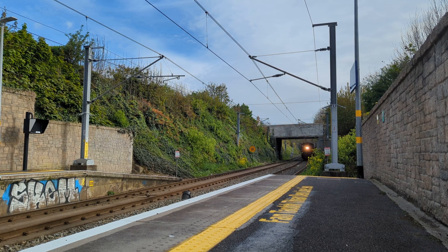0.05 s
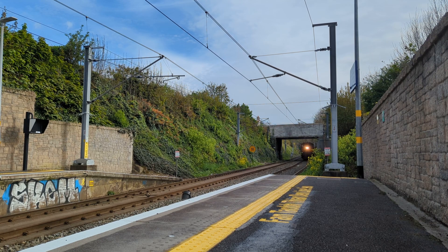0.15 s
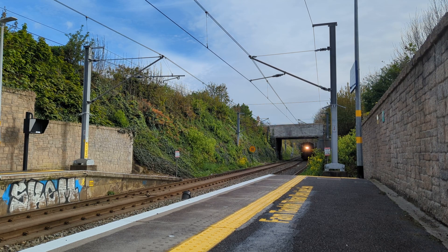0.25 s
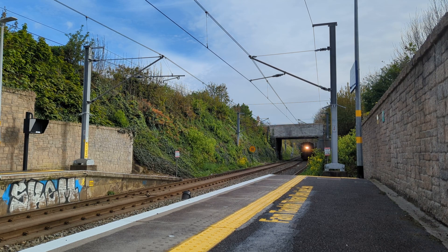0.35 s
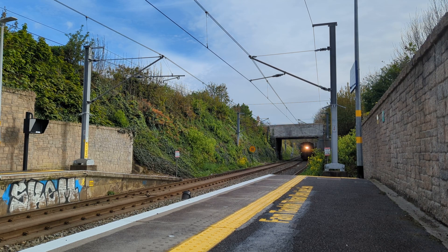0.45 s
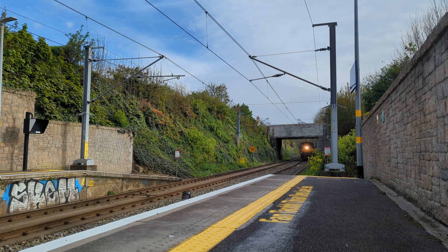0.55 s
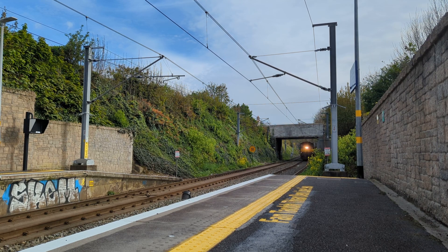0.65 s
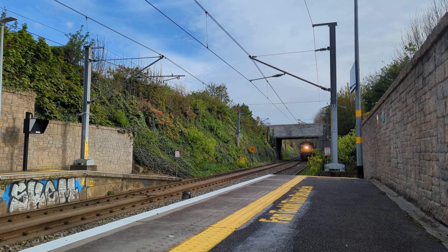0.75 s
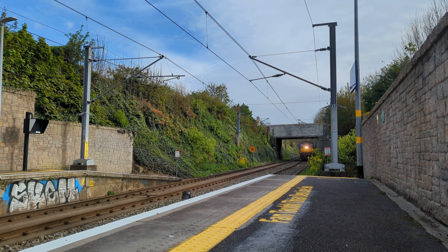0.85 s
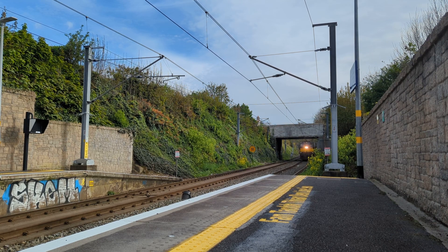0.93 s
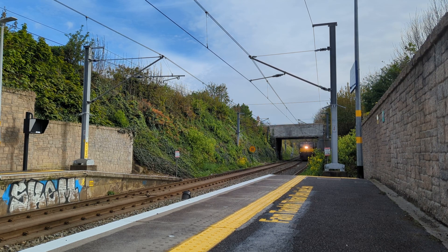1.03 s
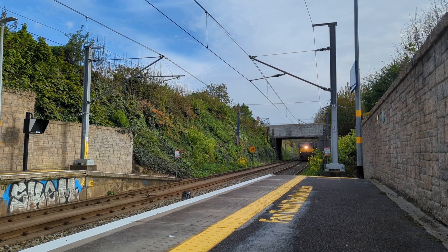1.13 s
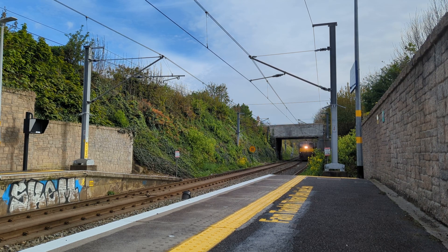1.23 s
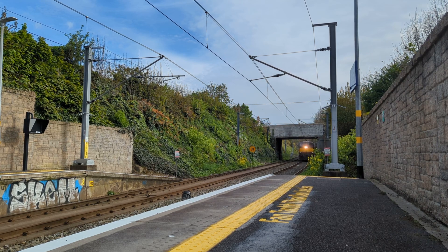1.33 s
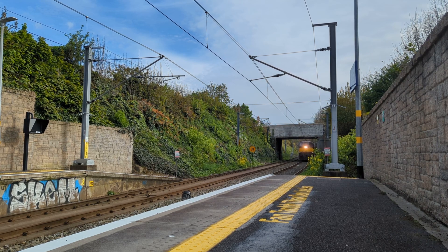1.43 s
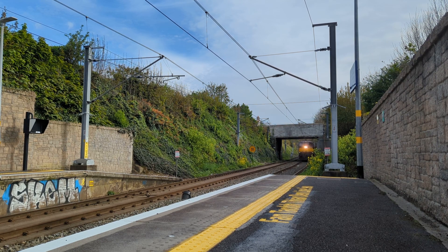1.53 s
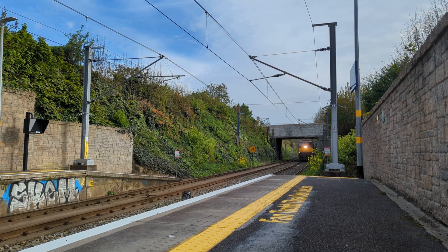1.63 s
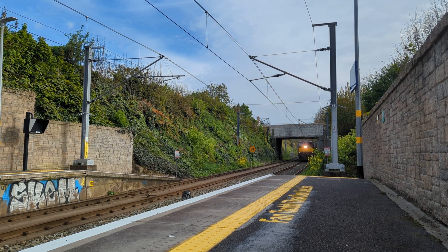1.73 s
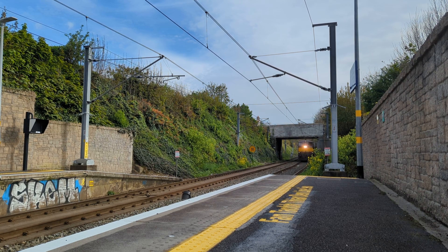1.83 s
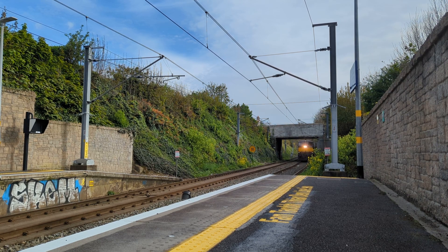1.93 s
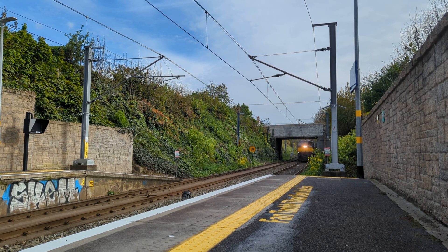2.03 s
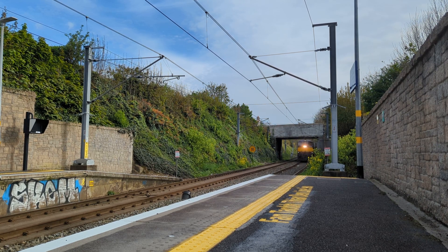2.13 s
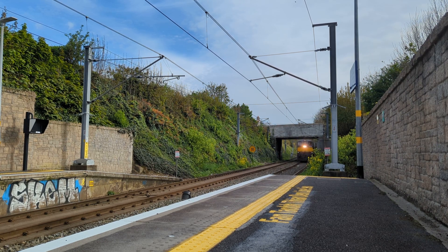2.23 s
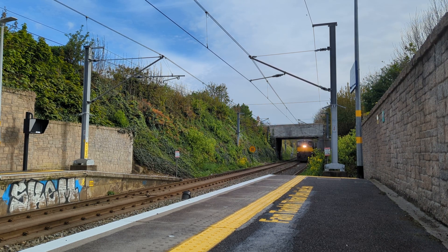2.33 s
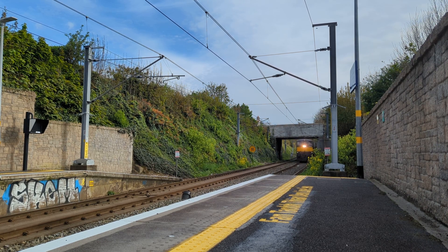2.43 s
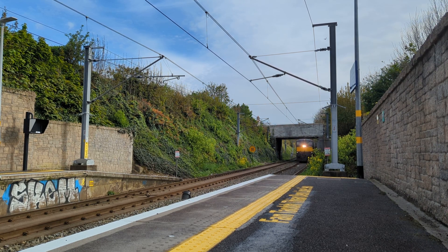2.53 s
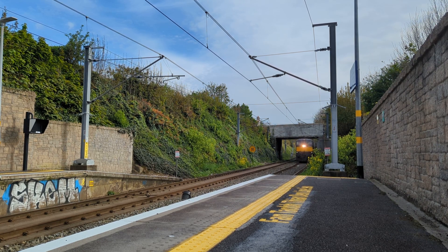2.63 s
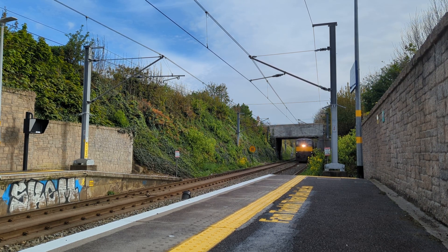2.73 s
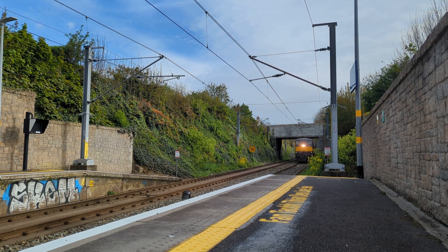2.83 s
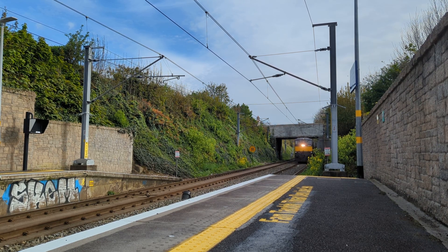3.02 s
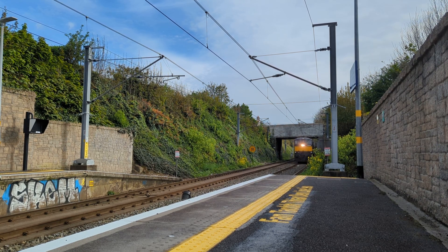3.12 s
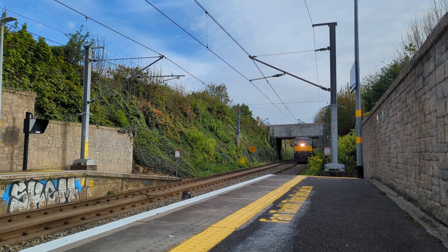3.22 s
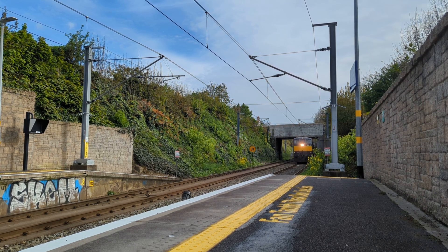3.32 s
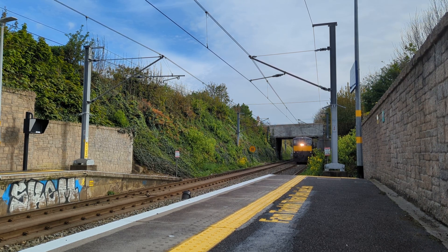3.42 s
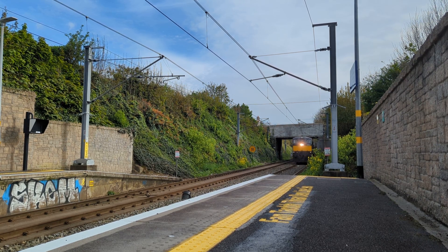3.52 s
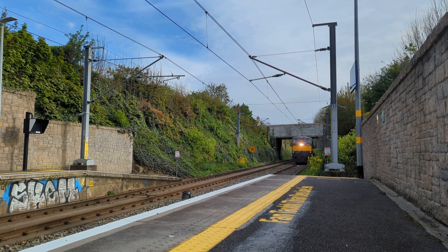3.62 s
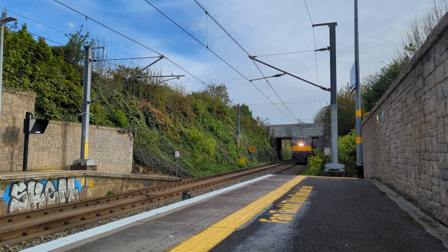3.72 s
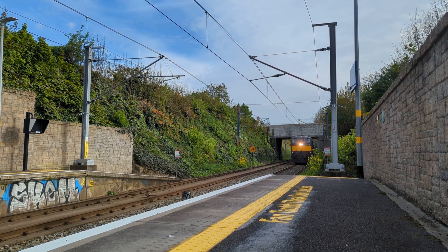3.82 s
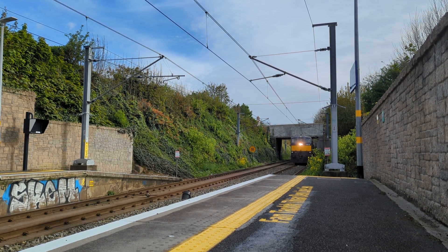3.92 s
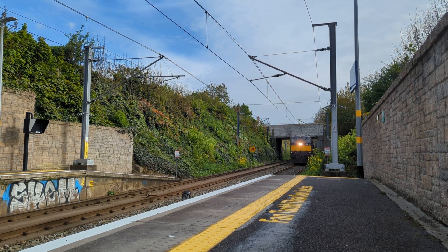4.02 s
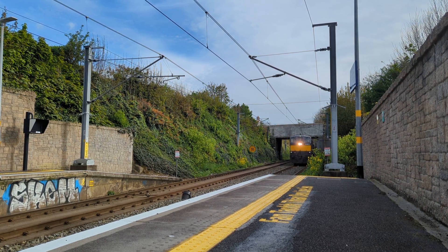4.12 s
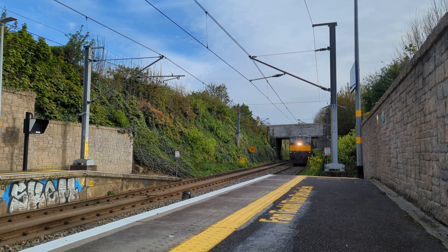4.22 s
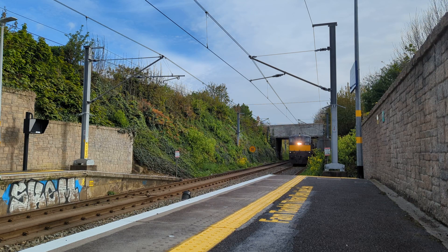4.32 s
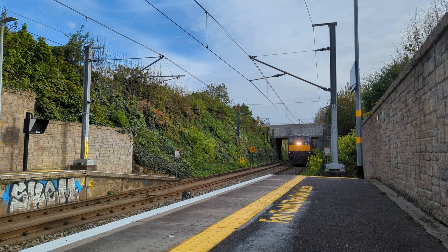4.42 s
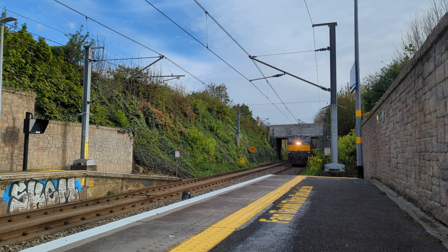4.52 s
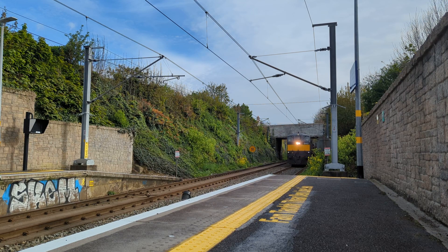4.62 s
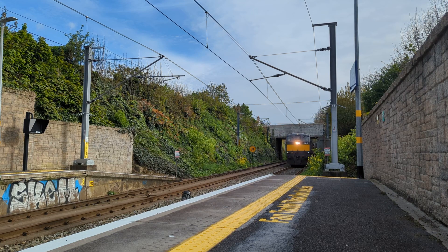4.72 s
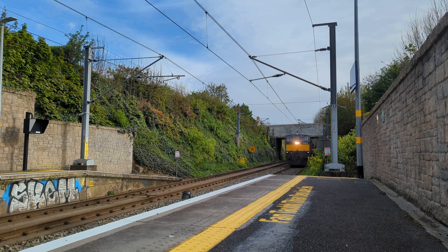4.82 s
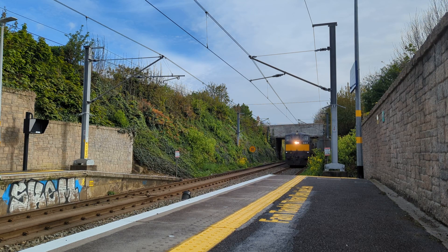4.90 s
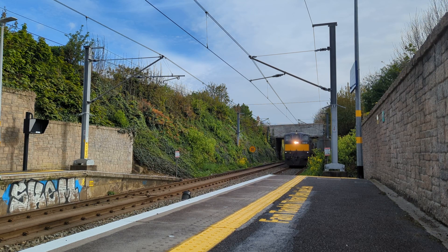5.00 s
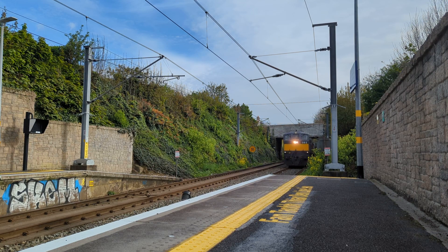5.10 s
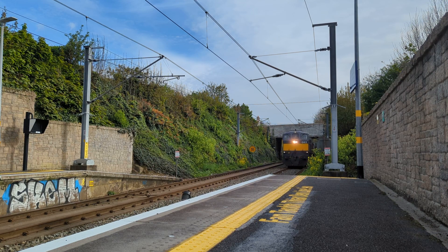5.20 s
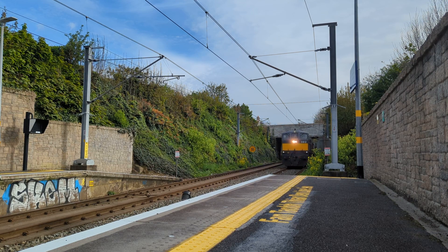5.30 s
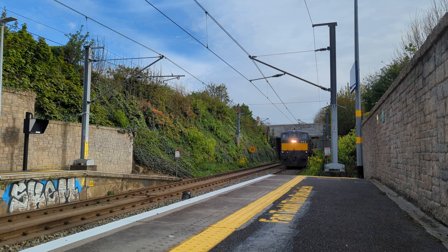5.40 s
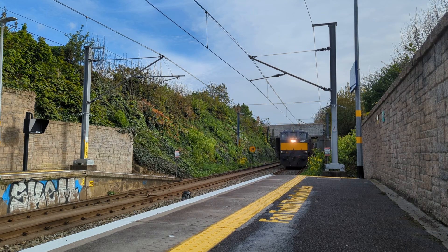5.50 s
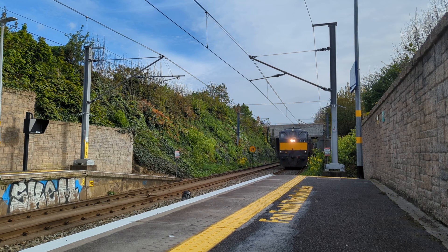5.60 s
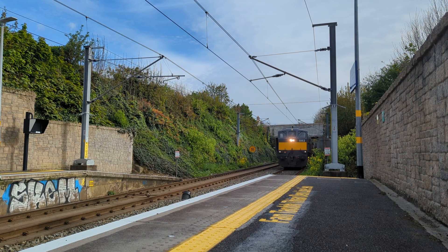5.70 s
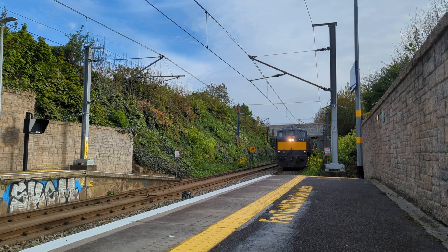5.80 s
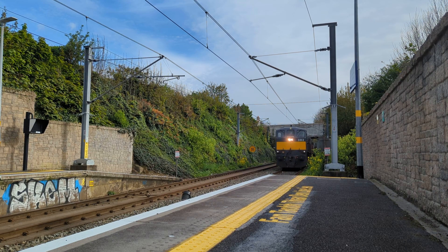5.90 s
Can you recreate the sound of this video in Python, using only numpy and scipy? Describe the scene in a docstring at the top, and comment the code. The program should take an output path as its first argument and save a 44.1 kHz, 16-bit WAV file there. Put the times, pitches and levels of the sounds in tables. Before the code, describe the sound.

A horn's beating echo decays between stone walls and banks, leaving a slow, uneven diesel throb and low rumble. Quick high bird whistles and a faint repeated buzzing call sit above it. After about four seconds the locomotive revs up, its exhaust beat stronger and blower whistle rising and widening. A harsh single-note air horn bursts in at the close. Stationary stereo pickup, train approaching from ahead, little wind.

```python
"""A walled platform in a cutting, a diesel locomotive nearing. The echo of a horn blast dies away as
detuned sines; the exhaust throbs as beating firing orders; rumble, roar and hiss are shaped noise.
The engine and its turbine (smeared tones) speed up, birds (bent sines) call from the banks,
and the air horn (a stack of partials) sounds again, close.
The microphone cuts the deepest bass; the recorder's band-splitting filters mirror tones about 8 and 16 kHz."""
import sys
import numpy as np
from scipy import signal
from scipy.fft import rfft, irfft, next_fast_len
from scipy.io import wavfile
from scipy.ndimage import uniform_filter1d, map_coordinates

SR = 44100
rng = np.random.default_rng(int(sys.argv[2]) if len(sys.argv) > 2 else 0)


def elevation(decibels):
    """Turn decibel levels (scalar or array-like) into linear amplitude ratios."""
    levels = np.asarray(decibels, float)
    return 10 ** (levels / 20)


def put_to_file(sound):
    """Save the sound as 16-bit audio at rate SR, in the file named by the first command-line argument."""
    columns = np.atleast_2d(sound).T  # one column per channel
    safe = np.clip(columns, -1, 1)
    whole_steps = np.round(safe * 32767)
    wavfile.write(sys.argv[1], SR, whole_steps.astype(np.int16))


N = 262395

# Left-right likeness of noise. Each row: frequency in Hz, likeness 0-1.
ALIKE = [(60, 0.93), (150, 1), (380, 0.95), (950, 0.65), (2370, 0.066), (5960, 0.074), (14900, 0.03)]
# Reverberation of banks and walls. Each row: frequency in Hz, 60 dB decay time in seconds.
CUTTING_DECAY = [(300, 0.8), (2000, 0.5), (8000, 0.19)]
# Gain as the train leaves the bridge and nears. Each row: time in seconds, gain in dB.
APPROACH = [(.75, -7.5), (1.65, -2), (2.7, -2), (3.5, 1.5), (4, 2.5), (5, 4), (5.75, 5.5)]
# Engine speed. Each row: time in seconds, share of the coasting speed.
SPEED = [(0, 0.995), (3.7, 1), (4.25, 1.015), (4.7, 1.11), (5.2, 1.2), (5.55, 1.25), (5.95, 1.26)]
FULL_POWER_RISE = 0.21  # rise of the speed share at which the engine pulls hard
LEFT_LAG_S = 6.2e-5  # the right port is nearer to the train

# Bird whistles. Each row: start in seconds, length in seconds, start, middle and end pitch in Hz,
# level in dB before the flutter.
WHISTLES = [(.822, .022, 5100, 4700, 4300, -57), (0.847, .026, 3880, 3420, 2930, -56.5),
            (1.69, 0.064, 3400, 3660, 3430, -59), (1.975, .04, 7550, 8000, 8300, -64),
            (2.01, .055, 8200, 7700, 7500, -64), (2.075, .06, 7900, 6900, 7600, -62),
            (2.085, .105, 8750, 8620, 8400, -66), (2.19, .068, 7450, 8100, 8350, -56),
            (2.26, .19, 8300, 8150, 8050, -67), (2.303, 0.024, 4050, 3630, 3750, -48),
            (2.318, 0.011, 4570, 4400, 4150, -50.5), (2.328, 0.02, 3690, 3350, 3360, -48),
            (2.345, .014, 3800, 4000, 3800, -56), (2.354, .013, 3700, 3450, 3350, -49),
            (2.381, .016, 3850, 3550, 3350, -48), (2.45, .021, 4050, 4100, 4750, -49),
            (2.491, .018, 4500, 4500, 4550, -48), (2.524, .034, 4500, 3550, 3350, -43),
            (2.566, 0.016, 3750, 3534, 3320, -48), (2.58, 0.016, 3800, 3510, 3250, -54),
            (2.6, 0.1, 3210, 3120, 3190, -59), (2.684, 0.03, 3090, 3080, 3000, -61),
            (2.794, .03, 7700, 7000, 7700, -53), (2.822, .032, 7800, 8000, 7000, -55),
            (2.794, .06, 6600, 6550, 6600, -48), (2.849, .024, 6600, 5750, 6900, -45),
            (2.872, .026, 6800, 7000, 6700, -54), (2.865, .045, 7500, 8600, 8000, -57),
            (2.897, .022, 6600, 6300, 6550, -50), (2.91, .035, 8300, 8500, 8200, -60),
            (2.92, .03, 6600, 6600, 6500, -58), (2.972, .034, 6850, 6550, 6400, -51),
            (3.59, .17, 7500, 7100, 6850, -61), (3.58, .06, 8450, 8600, 8800, -66),
            (5.412, 0.023, 4820, 4500, 3670, -52), (5.58, 0.13, 8800, 8500, 8410, -62.5)]
# Starts of two-part chirps in seconds.
CHIRP_STARTS_S = [1.633, 4.46]
# Rising rasp of a chirp: length in seconds, start, middle and end pitch in Hz, level in dB before roughening.
RASP = (.041, 4371.5, 4753.5, 5414, -51)
# Whistle after the rasp: delay in seconds, length in seconds, start, middle and end pitch in Hz,
# level in dB before the flutter.
ARCH = (.039, .059, 2789.5, 3203, 2901, -49.5)
# Mean tones of a farther bird's buzz. Each row: frequency in Hz, level in dB before roughening.
BUZZ_TONES = [(6310, -62), (5790, -65), (5270, -72)]
BUZZ_START_S, BUZZ_EVERY_S, BUZZ_COUNT = 3.81, .156, 6
BUZZ_FIRST_LENGTH_S, BUZZ_SHRINKS_S = .09, .006  # each note is shorter than the last

# Echo of the earlier blast; rows for the first, second, third and higher partials. Each row: near walls
# in dB, their fall in dB/s, far banks in dB, their fall in dB/s.
ECHO = [(-27.5, 112, -40.5, 25), (-30, 125, -38, 28), (-31, 63, -34.5, 42), (-36.5, 81, -30.5, 40)]
# Weight of the partials above the third. Each row: frequency in Hz, gain in dB.
ECHO_TOPS = [(1950, -5.5), (2900, -12), (5300, -18), (7000, -30), (9000, -41.5), (12500, -47), (15000, -51)]
# Banks met at different speeds. Each row: fundamental in Hz, relative level in dB (scaled by partial).
ECHO_PATHS = [(489.4, 0.5), (486.4, -10), (484.9, 5)]
# A far wall returns the fundamental once more: time in seconds, spread in seconds, level in dB.
LATE_RETURN = (0.18, .045, -34)
ECHO_DULLS_DB_PER_OCTAVE_S = 4.3

# Noise spectra of the train. Each row: frequency in Hz, relative density in dB per Hz.
RUMBLE_SPECTRUM = [(25, -42.5), (40, -14.5), (60, -1.5), (85, -3), (130, -8.5), (240, -14), (300, -22),
                   (500, -26.5), (650, -52.5), (1100, -120)]
ROAR_SPECTRUM = [(150, -13), (250, -5.5), (297, -10), (759, -16.5), (1910, -19.5), (2370, -24),
                 (2730, -24.5), (3730, -30.5), (4560, -30), (5810, -39.5), (7500, -49), (9750, -78),
                 (16500, -120)]
HISS_SPECTRUM = [(2940, -33.5), (5000, -4), (7250, -13.5), (8510, -13.5), (9220, -17.5), (9940, -26),
                 (11700, -20), (13600, -34), (15400, -46)]
# Running noises, each: base level in dB, share of the approach gain, lift under power in dB.
RUMBLE_LEVEL, ROAR_LEVEL, HISS_LEVEL = (-36, 0.84, 1.7), (-44.5, 0.73, -0.88), (-67.5, 0.77, 4.9)

# Turbine whine. Each row: time in seconds, frequency in Hz, gain in dB.
TURBINE = [(.45, 4580, -75), (.7, 4544, -65), (1.3, 4560, -55.5), (2.7, 4436, -61), (3.5, 4450, -62),
           (3.9, 4583, -59), (4.4, 4932, -59), (5.95, 5877, -56.5)]
# Its wavering bands. Each row: multiple of the whine, width in Hz, level in dB, share of the approach gain.
WHINE_BANDS = [(1.002, 50, -2, -0.31), (.976, 150, -1.5, 0.92), (.62, 70, -2.5, -0.01)]
# Bands that join as it speeds up. Each row: multiple of the whine, width in Hz, level in dB.
SPREAD_BANDS = [(.97, 400, -1), (.61, 200, -7), (2, 500, -20), (.187, 33, 3)]
# Steady fan band: centre in Hz, width in Hz.
FAN = (2600, 80)
# Fan level. Each row: time in seconds, level in dB.
FAN_LEVEL = [(.6, -70.5), (2.5, -71.5), (4, -56.5), (5.5, -69.5)]

BELL_HZ = 493.2
# Near blast. Each row: time in seconds, diaphragm in Hz, fundamental gain in dB, overtone gain in dB.
BLAST = [(5.762, 400, -45, -45), (5.774, 424, -14, -10), (5.784, 438, -5, -2), (5.798, 465, 2.5, -4),
         (5.806, 493, 2.5, -2), (5.815, 494.5, 1.5, -.5), (5.875, 493.2, -1.5, -1),
         (5.915, 492.5, 1.5, -3.5), (5.95, 491.5, .5, -12)]
# Low horn partials as ground and walls deliver them. Each row: partial number, left in dB, right in dB.
HORN_PARTIALS = [(1, -16, -15), (2, -15, -23), (3, -24, -33), (4, -37, -29), (5, -27.5, -30), (6, -26, -40),
                 (7, -28, -32), (8, -36, -27), (9, -33, -37), (10, -40, -40), (11, -40, -35),
                 (12, -37, -35), (13, -31, -41), (14, -42, -35)]
# Higher horn partials. Each row: frequency in Hz, mean level in dB.
HORN_TOPS = [(7400, -35), (8500, -40), (11000, -36), (13000, -42.5), (15000, -49), (16800, -57.5)]
TOPS_SCATTER_DB, TOPS_RIGHT_DB = 2.5, 2.5  # from partial to partial; right over left
# Treble slope in dB per octave for each dB of weaker overtones, and its limit in dB per octave.
DULLING, DULLEST = .5, 2.6
# Rush of air in the horn. Each row: frequency in Hz, relative density in dB per Hz.
AIR_SPECTRUM = [(300, -20), (900, -2.5), (3000, 3.5), (4500, -17.5), (15000, -27.5)]

EXHAUST_HZ, CYCLE_HZ = 48.8, 2.7  # note and firing cycle at coasting speed
# Weaker orders of the firing cycle. Each row: order, coasting level in dB before the approach gain,
# level under power in dB.
ORDERS = [(12.6, -60.5, -32.5), (22.05, -47, -44.5), (28.8, -59.5, -39.5), (29.54, -49, -29),
          (32.6, -54, -41.5), (32.08, -37, -34.5), (34.23, -46.5, -28.5), (36.3, -51.5, -35),
          (46.56, -51.5, -39), (92.9, -53.5, -66.5)]
# Overtone that throbs with the note: multiple, coasting level in dB, level under power in dB, both re the note.
THIRD = (3.02, -20, -28)
# Throbs, where the note and its upper neighbour order fall in step. Each row: time in seconds,
# crest in dB, neighbour's share 0-1 until the next crest.
THROBS = [(-.05, -30, 0.3), (.23, -26, 0.23), (.46, -36.5, 0.5), (.64, -32, 0.1), (.84, -28, 0.75),
          (1.02, -34, 0.02), (1.229, -24.5, 0.3), (1.56, -21, 0.45), (1.919, -20, 0.72),
          (2.31, -18.5, 0.56), (2.67, -20.5, 0.63), (3.1, -21.5, .7), (3.28, -26.5, 0.6), (3.41, -24, 0.08),
          (3.569, -21.5, 0.37), (3.97, -19, 0.03), (4.211, -15, 0.7), (4.36, -26.5, .85), (4.489, -20, .4),
          (4.68, -14, 0.29), (4.88, -18, 0.87), (5.0, -28, 0.3), (5.111, -15.5, 0.7), (5.25, -13, 0.52),
          (5.411, -14, .55), (5.6, -18, .5), (5.73, -13.5, .5), (5.89, -19.5, 0), (6.05, -11, .5)]

# Mirror images from the band-splitting filters. Each row: mirror frequency in Hz, width in Hz, image level in dB.
MIRRORS = [(8000, 620, -1.5), (16000, 500, -3)]


def unit(x):
    """Scaled to rms 1."""
    return x / np.sqrt(np.mean(np.abs(x) ** 2) + 1e-20)


def along(points, hz):
    """(Hz, value) points read on a log frequency axis."""
    f, v = np.transpose(points)
    return np.interp(np.log(hz + 1), np.log(f + 1), v)


def curves(rows, size=N):
    """One value per sample for each column after the time."""
    s, *columns = np.transpose(rows)
    return [np.interp(np.arange(size) / SR, s, column) for column in columns]


def wobble(knots_per_s, size=N):
    """A smooth random curve through normal draws."""
    knots = rng.standard_normal(int(size * knots_per_s / SR) + 4)
    return map_coordinates(knots, [np.arange(size) * knots_per_s / SR])


def phase(hz):
    """Running phase of a changing frequency, in radians."""
    return 2 * np.pi * np.cumsum(hz) / SR


def filtered(x, response):
    """x times a response of frequency."""
    m = next_fast_len(N + 8192)
    return irfft(rfft(x, m) * response(np.fft.rfftfreq(m, 1 / SR)), m)[..., :N]


def rush(spectrum, patchy_db):
    """Stereo noise of rms 1 with patches of random gain; alike in the bass, unrelated in the treble."""
    z = signal.stft(rng.standard_normal((2, N)), nperseg=512)[2]
    field = rng.standard_normal(z.shape[1:])
    field = uniform_filter1d(uniform_filter1d(field, 5, 0), 12, 1)
    pair = signal.istft(z * elevation(patchy_db * unit(field)), nperseg=512)[1][:, :N]

    def mid_side(hz):
        angle = np.arccos(np.clip(along(ALIKE, hz), -1, 1)) / 2
        return elevation(along(spectrum, hz)) * [np.cos(angle), np.sin(angle)]

    mid, side = filtered(pair, mid_side)
    return unit(np.array([mid + side, mid - side]))


def fuzzy(turning, width_hz):
    """A tone smeared into a narrow band by random quadrature gains, new on each side."""
    return np.array([unit(wobble(width_hz) * np.cos(turning) + wobble(width_hz) * np.sin(turning))
                     for side in range(2)])


def cutting(x, delay_s):
    """The banks and walls answer with decaying noise; each frequency dies at its own speed."""
    hz, t, z = signal.stft(rng.standard_normal((2, SR // 2)), SR, nperseg=256)
    decay = elevation(-60 * t / along(CUTTING_DECAY, hz)[:, None])
    tail = signal.istft(z * decay, SR, nperseg=256)[1]
    late = np.pad(x * np.ones((2, 1)), ((0, 0), (round(delay_s * SR), 0)))
    return signal.fftconvolve(late, tail / np.linalg.norm(tail[0]), axes=1)[:, :N]


def power():
    """Engine load from its speed: 0 while coasting, 1 when it pulls hard."""
    return np.clip((curves(SPEED)[0] - 1) / FULL_POWER_RISE, 0, 1)


def nearer_right(x):
    """The left port hears the train a little later."""
    return filtered(x, lambda hz: np.exp(-2j * np.pi * hz * np.c_[[LEFT_LAG_S, 0]]))


def add_note(track, start_s, length_s, pitches_hz, db):
    """Adds one soft-edged sine that bends through three pitches."""
    u = np.linspace(0, 1, round(length_s * SR))
    hz = np.polyval(np.polyfit([0, .5, 1], pitches_hz, 2), u)
    envelope = np.sin(np.pi * u) ** .45
    track[round(start_s * SR):][:len(u)] += elevation(db) * np.sqrt(2) * envelope * np.sin(phase(hz))


def birds():
    """Clear whistles, two-part chirps and a repeated buzz, with a faint echo in the cutting."""
    clear, rasp, far = np.zeros((3, N))
    for start_s, length_s, *hz, db in WHISTLES:
        add_note(clear, start_s, length_s, hz, db)
    for start_s in CHIRP_STARTS_S:
        length_s, *hz, db = RASP
        add_note(rasp, start_s, length_s, hz, db)
        add_note(rasp, start_s, length_s, 2 * np.array(hz), db - 22)
        delay_s, length_s, *hz, db = ARCH
        add_note(clear, start_s + delay_s, length_s, hz, db)
    for n in range(BUZZ_COUNT):
        start_s = BUZZ_START_S + n * BUZZ_EVERY_S
        length_s = BUZZ_FIRST_LENGTH_S - n * BUZZ_SHRINKS_S
        for hz, db in BUZZ_TONES:
            bend = 1 + .006 * rng.standard_normal(3)
            add_note(far, start_s, length_s, hz * bend, db + 1.5 * rng.standard_normal())
    flutter = elevation(4 * wobble(150) - 3)  # leaves and moving air break up the notes
    near = clear * flutter + rasp * (0.5 + wobble(700))
    far = far * (0.3 + wobble(220)) * elevation([[1.2], [-1.5]])
    song = near * elevation([[.1], [-.8]]) + far
    return song + cutting(elevation(-10) * song + elevation(-5) * far, delay_s=.008)


def horn_echo():
    """Each partial returns by several paths, slightly out of tune, so that it beats as it fades."""
    size = SR
    t = np.arange(size) / SR
    out = np.zeros((2, N))
    for k in range(1, 32):
        near_db, near_fall, far_db, far_fall = ECHO[min(k, len(ECHO)) - 1]
        level = elevation(near_db - near_fall * t) + elevation(far_db - far_fall * t)
        if k == 1:
            late_s, spread_s, late_db = LATE_RETURN
            level += elevation(late_db) * np.exp(-((t - late_s) / spread_s) ** 2 / 2)
        if k > 3:
            dulled_db = ECHO_DULLS_DB_PER_OCTAVE_S * t * np.log2(k / 3)
            level *= elevation(along(ECHO_TOPS, k * ECHO_PATHS[0][0]) - dulled_db)
        for side in range(2):
            if side == 0 or k > 2:  # the longest waves are the same on both sides
                paths = np.zeros(size)
                for hz, path_db in ECHO_PATHS:
                    gain = elevation(path_db * 1.7 / k + 2.7 * np.log2(0.63 * k) * wobble(13.7, size=size))
                    offset = (k > 1) * rng.uniform(0, 2 * np.pi)  # paths of the first set out in step
                    paths += gain * np.sin(2 * np.pi * k * hz * t + offset)
            out[side, :size] += level * unit(paths)
    return out


def running_noise():
    """Rumble of the mass, roar of wheels and cooling air, and far hiss, swelling as the train nears."""
    nearing_db, = curves(APPROACH)
    pull = power()
    rumble_db, roar_db, hiss_db = [db + share * nearing_db + lift_db * pull
                                   for db, share, lift_db in (RUMBLE_LEVEL, ROAR_LEVEL, HISS_LEVEL)]
    swell = wobble(2.734)
    rumble = elevation(rumble_db + 0.42 * wobble(5.7)) * rush(RUMBLE_SPECTRUM, patchy_db=0.97)
    roar = elevation(roar_db + 1.3 * swell + 0.45 * wobble(15)) * rush(ROAR_SPECTRUM, patchy_db=0.83)
    hiss = elevation(hiss_db + 0.48 * swell) * rush(HISS_SPECTRUM, patchy_db=-0.4)
    return rumble + roar + hiss


def turbine():
    """The blower's unsteady whistles climb and widen with its speed; a fan band stays put."""
    hz, db = curves(TURBINE)
    turning = phase(uniform_filter1d(hz, SR // 4))
    distant_db = np.minimum(curves(APPROACH)[0], 0)
    whine = np.zeros((2, N))
    for multiple, width_hz, level_db, share in WHINE_BANDS:
        gain = elevation(level_db + share * distant_db + 0.75 * wobble(9.5))
        whine += gain * fuzzy(multiple * turning, width_hz)
    joining = np.clip((hz - 4400) / 900, .05, 1)
    for multiple, width_hz, level_db in SPREAD_BANDS:
        whine += joining * elevation(level_db) * fuzzy(multiple * turning, width_hz)
    fan_hz, fan_width_hz = FAN
    fan = elevation(curves(FAN_LEVEL)[0]) * fuzzy(phase(np.full(N, fan_hz)), fan_width_hz)
    return elevation(db) * whine + fan


def horn():
    """The diaphragm climbs raggedly to the note of the bell, which holds the fundamental from the start."""
    start = round(BLAST[0][0] * SR)
    hz, fundamental_db, overtones_db = [c[start:] for c in curves(BLAST)]
    size = len(hz)
    t = np.arange(size) / SR
    high = np.arange(len(HORN_PARTIALS) + 1, HORN_TOPS[-1][0] // BELL_HZ + 1)
    scatter_db = TOPS_SCATTER_DB * rng.standard_normal((2, len(high)))
    tops_db = along(HORN_TOPS, high * BELL_HZ) + scatter_db + TOPS_RIGHT_DB * np.c_[[-.5, .5]]
    k, left_db, right_db = np.hstack([np.transpose(HORN_PARTIALS), [high, *tops_db]])[..., None]

    unsettled = np.clip((.048 - t) / 0.004, 0, 1)
    turning = k * phase(hz * (1 + .03 * unsettled * wobble(400, size=size)))
    bell = phase(np.where(t < .045, BELL_HZ, hz))
    turning[0] = bell - bell[-1] + turning[0, -1]  # bell and diaphragm lock in step
    turning += 0.12 * (k - 1) * rng.standard_normal(k.shape)  # short waves arrive out of step

    dulling = np.clip(-DULLING * overtones_db, 0, DULLEST)
    level_db = np.where(k == 1, fundamental_db, overtones_db - dulling * np.log2(k / 2))
    out = np.zeros((2, N))
    for side, db in enumerate((left_db, right_db)):
        # paths shift as the train moves
        drift_db = 1.05 * np.log2(k) * np.array([wobble(18, size=size) for partial in k])
        partials = np.sqrt(2) * elevation(db + level_db + drift_db) * np.cos(turning - .8)
        out[side, start:] = -np.sum(partials, axis=0)  # sharp suction, slow refill
    air = elevation(overtones_db - 33 - 1000 * np.maximum(t - .045, 0))  # before the note settles
    out[:, start:] += air * rush(AIR_SPECTRUM, patchy_db=1.5)[:, start:]
    return out + elevation(-25) * cutting(out, delay_s=.015)


def exhaust():
    """One strong note beats with its neighbour order, weaker firing orders round it; power lifts most."""
    speed, = curves(SPEED)
    pull = power()
    s, crest_db, share = np.transpose(THROBS)
    beats = np.interp(np.arange(N) / SR, s, np.arange(len(s)))
    share = np.clip(share, 0, 1)[beats.astype(int)]
    crest = elevation(np.interp(beats, np.arange(len(s)), crest_db))
    throb = crest * (1 + share * np.exp(2j * np.pi * beats)) / (1 + share)

    firing = phase(EXHAUST_HZ * speed * (1 + 0.0064 * wobble(5.1)))
    multiple, coast_db, power_db = THIRD
    third_gain = elevation((1 - pull) * coast_db + pull * power_db + 1.4 * wobble(4.4))
    third = third_gain * np.sin(multiple * (firing + np.angle(throb)))
    note = np.sqrt(2) * (np.imag(throb * np.exp(1j * firing)) + np.abs(throb) * third)

    cycle = phase(CYCLE_HZ * speed)
    nearing_db, = curves(APPROACH)
    for order, coast_db, power_db in ORDERS:
        level_db = (1 - pull) * (coast_db + nearing_db) + pull * power_db + 1.5 * wobble(2.72)
        note += np.sqrt(2) * elevation(level_db) * np.sin(order * cycle + rng.uniform(0, 2 * np.pi))
    return np.array([note, (1 + .1 * wobble(5)) * note])  # the right level wavers slightly


def scene():
    """Everything at the platform."""
    train = running_noise() + turbine() + horn() + exhaust()
    return birds() + horn_echo() + nearer_right(train)


def roll_off(x):
    """The treble ends steeply here."""
    return signal.sosfilt(signal.butter(12, 15540, fs=SR, output="sos"), x)


def record(dry):
    """The ports cut the deepest bass; the band-splitting filters mirror tones close to 8 and 16 kHz."""
    t = np.arange(N) / SR
    out = filtered(dry, lambda hz: 1 / (1 + (34 / (hz + 1)) ** 8))
    for mirror_hz, width_hz, db in MIRRORS:
        near = lambda hz: np.exp(-((hz - mirror_hz) / width_hz) ** 2 / 2)
        folded = filtered(dry, near) * 2 * np.cos(4 * np.pi * mirror_hz * t)
        out = out + elevation(db) * filtered(folded, near)
    return roll_off(out)


dry = scene()
out = record(dry)
put_to_file(out)
```